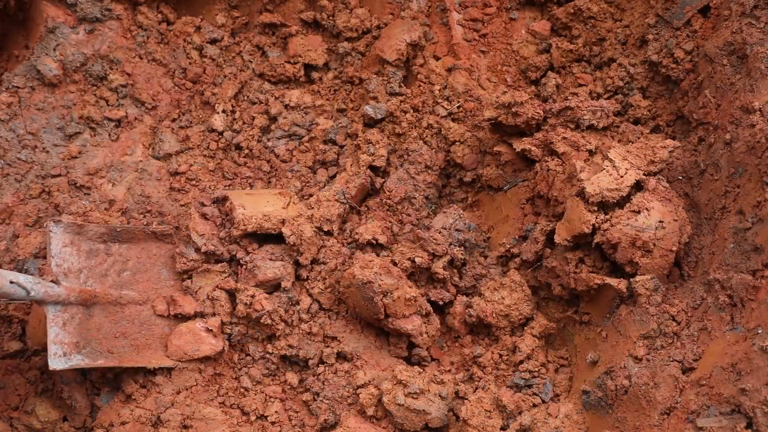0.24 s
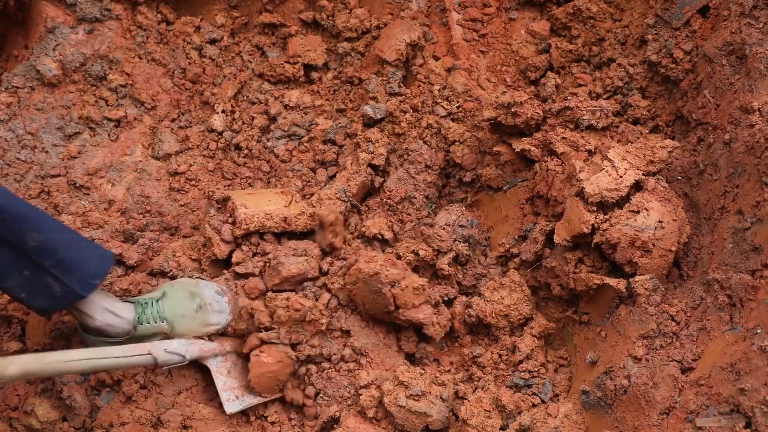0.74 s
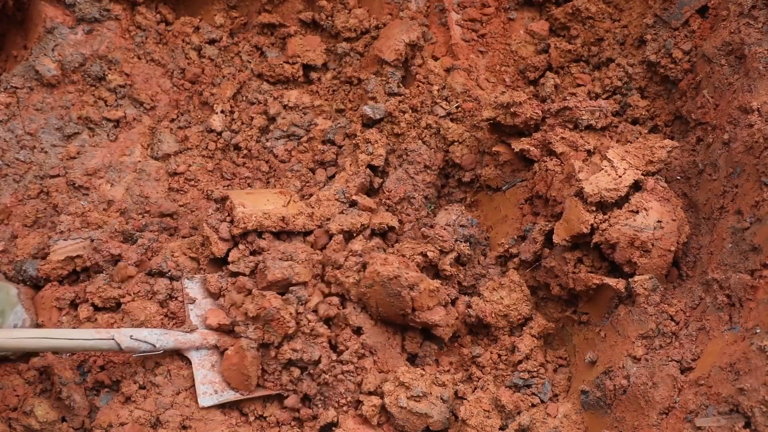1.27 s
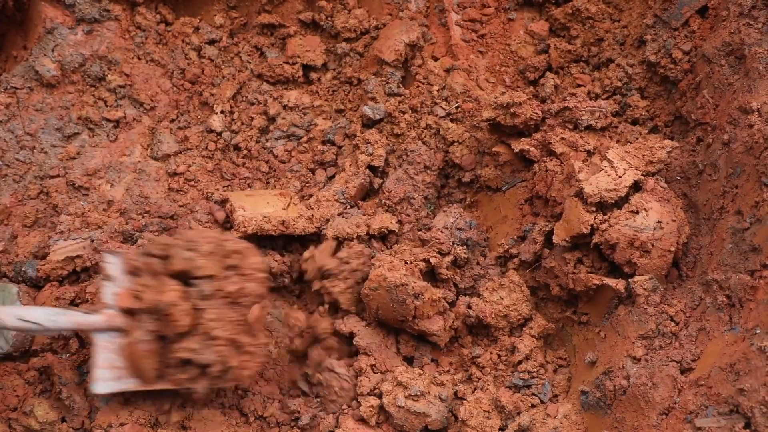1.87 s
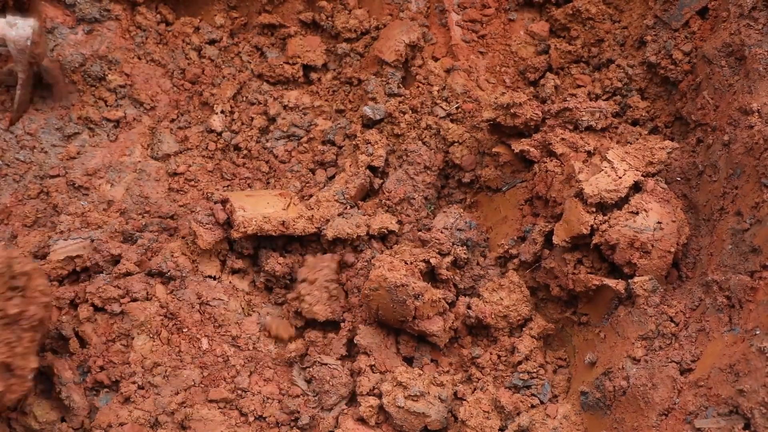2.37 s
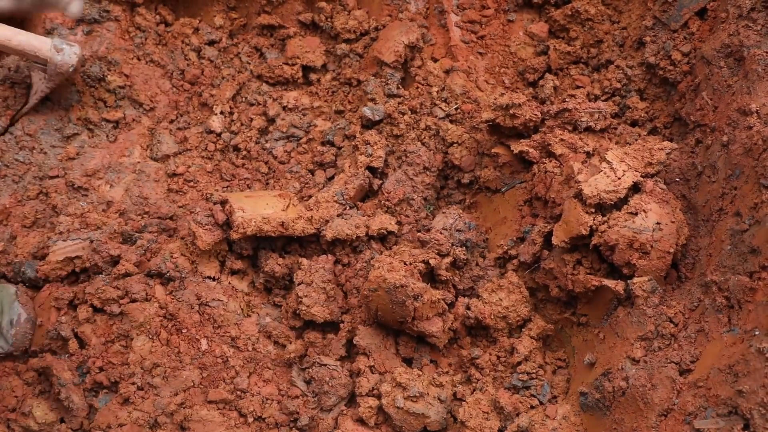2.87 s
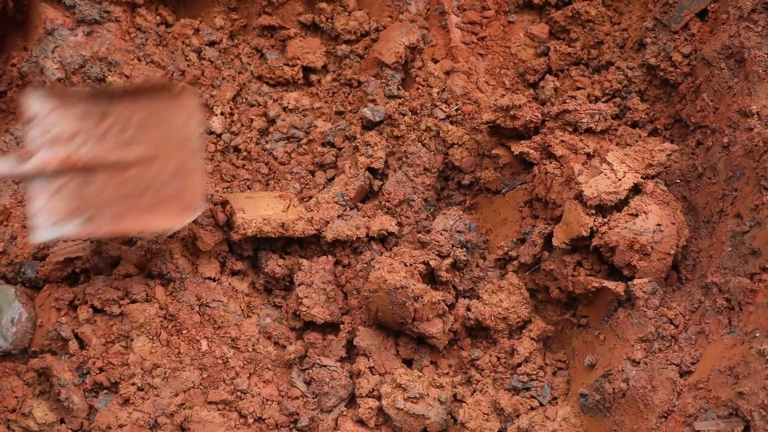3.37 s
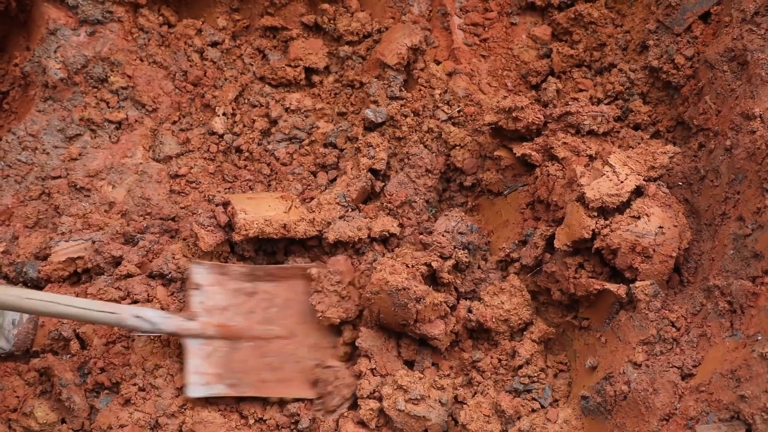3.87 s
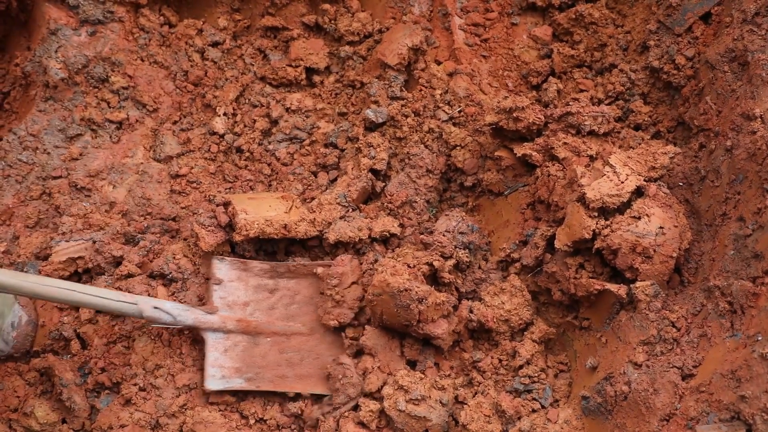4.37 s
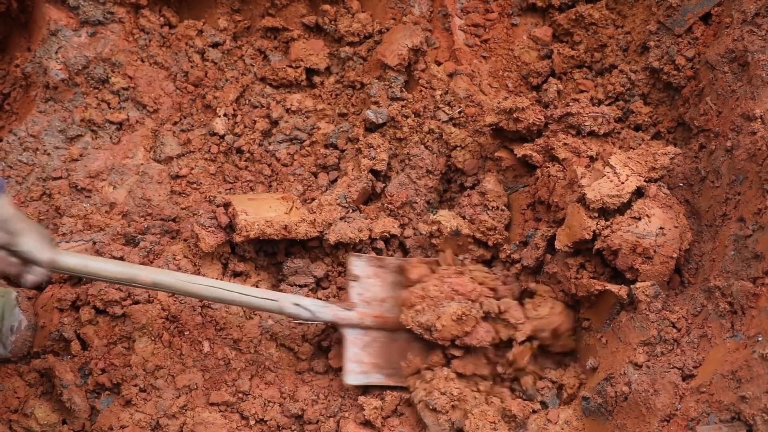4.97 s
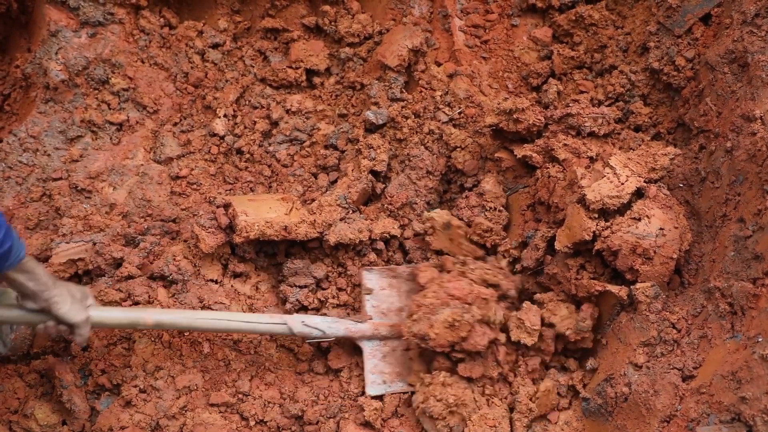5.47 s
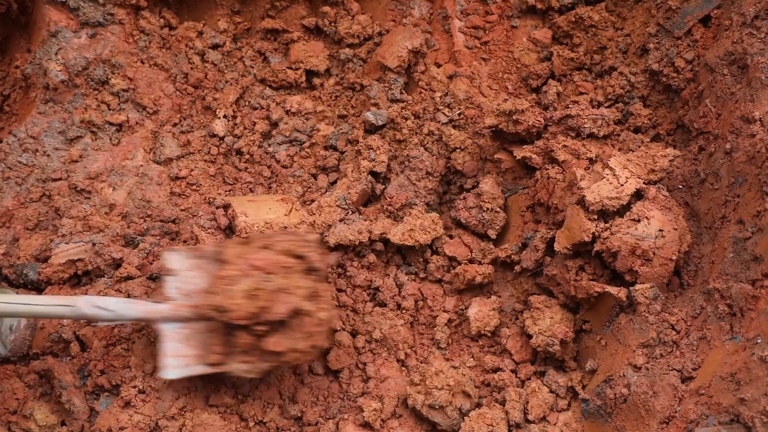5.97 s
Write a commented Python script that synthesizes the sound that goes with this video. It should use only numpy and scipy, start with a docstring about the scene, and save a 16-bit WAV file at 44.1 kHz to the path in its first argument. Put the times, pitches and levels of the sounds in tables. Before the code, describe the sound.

Close, irregular digging outdoors in damp clay. A spade crunches in, grit rasping along the steel, and loose crumbs tick quietly. A stone snaps sharply against the blade and tossed clods land with soft thumps. A brief metallic knock starts a second run of scrapes and crunches, which ends in a quiet rustle of soil. The open air behind is only a faint hiss.

```python
"""A steel spade is trodden and pushed into wet, crumbly clay, and the loads are lifted and thrown.
Stick-slip friction drives the sound: clods crush dully and grit rasps along the blade, exciting its
damped modes. Stones knock and snap on the steel, air pockets pop in the mud, and the emptied blade hums.
Falling soil thuds on the ground. Behind it lie a faint outdoor hiss and a few low puffs of wind."""
import sys
import numpy as np
from scipy import signal
from scipy.fft import rfft, irfft
from scipy.io import wavfile

SR = 44100
rng = np.random.default_rng(int(sys.argv[2]) if len(sys.argv) > 2 else 0)


def store_pcm(level_fs):
    """Save levels as 16-bit WAV."""
    pcm = np.round(np.clip(level_fs, -1, 1) * 32767).astype(np.int16)
    wavfile.write(sys.argv[1], SR, np.atleast_2d(pcm).T)


N = 274863


def from_db(db):
    return 10 ** (np.asarray(db) / 20)


def unit_rms(x):
    return x / np.sqrt(np.mean(x ** 2) + 1e-20)


def band(x, low_hz, high_hz):
    return signal.sosfilt(signal.butter(2, [low_hz, high_hz], "band", fs=SR, output="sos"), x)


def high_pass(x, hz):
    return signal.sosfilt(signal.butter(4, hz, "high", fs=SR, output="sos"), x)


def place(out, start_s, sound, peak_db):
    """Superposition: adds a sound at the given time and peak level."""
    at = round(start_s * SR)
    out[at:at + len(sound)] += (from_db(peak_db) * sound / np.abs(sound).max())[:N - at]


def drift(rate_hz, step=40):
    """Random modulation: low-passed noise with a standard deviation of 1."""
    pole = np.exp(-2 * np.pi * rate_hz * step / SR)
    noise = rng.standard_normal(N // step + 2002)
    slow = signal.lfilter([1], [1, -2 * pole, pole * pole], noise)[2000:]
    return np.interp(np.arange(N) / step, np.arange(len(slow)), unit_rms(slow - slow.mean()))


def swell(full_s, rise_s, hold_s, fall_s, depth_db=25):
    """Exponential growth and decay about a hold at 1; rise_s and fall_s each span depth_db."""
    t = np.arange(N) / SR - full_s
    rising = t / max(rise_s, 0.002)
    falling = (hold_s - t) / max(fall_s, 0.002)
    return from_db(depth_db * np.minimum(0, np.minimum(rising, falling)))


def colour(x, spectrum, size=2048):
    """Spectral shaping by a minimum-phase filter of unit energy."""
    hz, level_db = np.transpose(spectrum)
    grid_hz = np.arange(size + 1) * SR / (2 * size) + 1
    gain = from_db(np.interp(np.log(grid_hz), np.log(hz), level_db))
    cepstrum = irfft(np.log(gain))
    cepstrum[1:size] *= 2   # folding the cepstrum makes the response causal
    cepstrum[size + 1:] = 0
    response = irfft(np.exp(rfft(cepstrum)))[:size]
    return signal.oaconvolve(x, response / np.sqrt(np.sum(response ** 2)))[:len(x)]


def ring(force, hz, t60_s):
    """Damped oscillator: a unit impulse starts a decaying sine of height 1."""
    radius, angle = from_db(-60 / (t60_s * SR)), 2 * np.pi * hz / SR
    return signal.lfilter([0, np.sin(angle)], [1, -2 * radius * np.cos(angle), radius ** 2], force + 1e-18)


def grains(per_s, spread_db, clump_db, clump_hz):
    """Shot noise: random breaks of uneven size that come in clumps; rms 1."""
    sizes = from_db(spread_db * np.minimum(rng.exponential(1, N), 5)) * rng.choice([-1, 1], N)
    breaks = rng.random(N) < per_s / SR
    return unit_rms(sizes * breaks * from_db(clump_db * drift(clump_hz)))


def crumble(noise, t60_s, crumbs_db):
    """Impact force: a unit impulse at contact, then crumbs that decay exponentially."""
    force = from_db(crumbs_db - 60 * np.arange(len(noise)) / SR / t60_s) * noise
    force[0] = 1
    return force


# spectrum of the distant hiss: frequency_hz, density_db
AIR_SPECTRUM = [(15, -59), (25, -3), (190, -6), (335, 4.5), (405, 1), (545, 1), (818, -6.5), (2000, 0),
                (2840, -4), (5280, -14), (7310, -15), (8140, -20.5), (10700, -17.5), (14800, -22.5),
                (16000, -34)]
# puffs of wind: full_s, hold_s, level_db
WIND_PUFFS = [(2.41, .01, -64), (2.83, .05, -69), (3.36, .01, -56), (4.58, .02, -69), (5.0, .02, -69),
              (5.928, 0.24, -54.5)]


def outdoors(hiss_db=-52, calm_db=-91.5, rise_s=0.12, fall_s=0.2):
    """Ambient noise: distant hiss, and wind pressure on the microphone at the bottom of hearing."""
    hiss = colour(rng.standard_normal(N), AIR_SPECTRUM, size=8192) * from_db(hiss_db + drift(1))
    pressure = unit_rms(band(rng.standard_normal(N), 16, 50))
    puffs = sum(from_db(db) * swell(full_s, rise_s, hold_s, fall_s) for full_s, hold_s, db in WIND_PUFFS)
    return hiss + (from_db(calm_db) + puffs) * from_db(0.74 * drift(8)) * pressure


# lumps and shoe striking the ground: start_s, peak_db, pitch_hz
GROUND_THUMPS = [(0.4277, -38.5, 213), (.564, -35, 136), (0.601, -28.5, 170), (1.1713, -43, 182),
                 (1.497, -48, 129), (2.376, -26.5, 135), (2.407, -33, 150), (2.9778, -35, 233),
                 (3.333, -29, 277), (3.357, -26, 100), (3.434, -31, 141), (4.464, -32, 215),
                 (4.588, -39, 235)]


def ground(thud_db):
    """Low-frequency excitation: shifting soil rumbles, and soft impacts set the ground booming."""
    shifting = grains(900, spread_db=2, clump_db=1.5, clump_hz=15)
    out = from_db(thud_db) * unit_rms(band(shifting, 100, 337))
    push = np.pad(np.hanning(130), (0, 9000))   # a contact of 3 ms
    for start_s, peak_db, pitch_hz in GROUND_THUMPS:
        place(out, start_s, ring(push, pitch_hz, t60_s=0.079), peak_db)
    return high_pass(out, 106)


def blade_hum(start_s=3.0, stop_s=3.31, pitch_hz=177.5, level_db=-57.5, rise_db_per_s=2):
    """Free vibration: the emptied blade's lowest bending mode, stopped when the spade is caught."""
    t = np.arange(N) / SR
    gate = np.clip(np.minimum(t - start_s, stop_s - t) / 0.025, 0, 1)
    gain = from_db(level_db + rise_db_per_s * np.clip(t - start_s, 0, 1))
    return gain * gate * np.sin(2 * np.pi * pitch_hz * t)


# wet mud squeezed round the shoe: full_s, rise_s, hold_s, fall_s, level_db
MUD_SQUEEZES = [(0.758, .01, 0.062, 0.063, -47), (1.0, 0.16, 0.19, .2, -53)]


def mud_sizzle():
    """Band-limited shot noise: tiny air pockets pop in squeezed mud."""
    gain = sum(from_db(db) * swell(*timing) for *timing, db in MUD_SQUEEZES)
    pops = grains(1200, spread_db=2.5, clump_db=2, clump_hz=58)
    return gain * unit_rms(band(pops, 4650, 6150))


# bright gritty hiss and clicks, as coloured by the microphone: frequency_hz, density_db
BRIGHT_SPECTRUM = [(2470, -7), (4200, 0.5), (5250, -10), (5880, -4), (6390, -6.5), (7070, -2), (8080, -9.5),
                   (8890, -3), (10900, -2.5), (13200, -14), (14700, -15.5), (15600, -37), (16000, -42)]
# grit snapping under the edge: start_s, peak_db, pitch_hz
GRIT_SNAPS = [(0.644, -10, 7150), (.7506, -28, 6400), (1.3683, -33, 6950), (1.7818, -32.5, 10100),
              (2.375, -3, 9000), (2.3797, -2, 10200), (2.4125, -8, 10000), (2.5334, -28.5, 5500),
              (2.586, -25.5, 7100), (2.6982, -28.5, 10000), (2.787, -22, 9330), (2.9435, -28, 11460),
              (2.9505, -27, 11460), (2.9898, -23, 10200), (3.807, -9, 8800), (3.809, -14, 6050),
              (3.8213, -9.5, 9400), (3.929, -14, 10500), (4.312, -24, 9300), (4.4982, -2.5, 9560),
              (4.539, -14.5, 9380), (4.5615, -22, 10610), (4.9923, -2, 9700), (5.0083, -2.5, 9400),
              (5.319, -30, 12000), (5.3236, -22.5, 11800)]


def grit_snaps(ping_db=4, t60_cycles=29):
    """Brittle fracture: a bright click, and a ping from the chip that breaks."""
    out = np.zeros(N)
    for start_s, peak_db, pitch_hz in GRIT_SNAPS:
        force = crumble(rng.standard_normal(3000), t60_s=0.024, crumbs_db=-21.5)
        click = unit_rms(colour(force, BRIGHT_SPECTRUM))
        ping = from_db(ping_db) * unit_rms(ring(force, pitch_hz, t60_cycles / pitch_hz))
        place(out, start_s, band(click + ping, 3600, 13800), peak_db)
    return out


# modes of the blade, damped by soil: pitch_hz, level_db, t60_s
BLADE_MODES = [(646, 10, 0.079), (786, -20.5, 0.013), (970, -1.5, 0.067), (1086, 8, 0.025),
               (1520, -2, 0.023), (1586, 4.5, 0.037), (1978, -6, 0.13), (2402, 8.5, 0.057),
               (2460, -8, 0.11), (2834, -3.5, 0.04), (2885, 8.5, 0.016), (3600, -28, 0.15),
               (3730, -1.5, 0.072)]


def blade(force):
    """Modal superposition: the blade's modes respond in parallel, with alternating signs."""
    return sum((-1) ** k * from_db(db) * ring(force, hz, t60_s)
               for k, (hz, db, t60_s) in enumerate(BLADE_MODES))


# clods and stones striking the blade: start_s, peak_db, pitch_hz, t60_s
LUMP_KNOCKS = [(0.551, -23.5, 3180, 0.014), (0.5611, -26.5, 740, 0.011), (0.579, -20, 1280, 0.026),
               (0.5989, -10.5, 1480, 0.0073), (0.6064, -6, 2650, .0062), (.613, -10, 600, 0.018),
               (0.6203, -5.5, 1610, 0.013), (.6481, -8.5, 1050, 0.042), (.8373, -18.5, 545, 0.064),
               (1.1016, -30, 3100, 0.016), (1.169, -25.5, 1650, 0.05), (1.268, -27.5, 1680, 0.021),
               (1.284, -29.5, 1600, 0.017), (1.363, -27, 1620, 0.019), (1.395, -31, 1230, 0.017),
               (1.408, -27, 1670, 0.0072), (1.786, -32.5, 1070, 0.005), (1.872, -32, 950, 0.0088),
               (2.253, -28.5, 1990, 0.0041), (2.379, -11.5, 1400, 0.036), (2.38, -9, 4050, .008),
               (2.3833, -17, 1770, 0.025), (2.4114, -8, 4030, .006), (2.4117, -6.5, 2370, 0.004),
               (2.534, -23.5, 2010, 0.011), (2.6412, -32, 1170, 0.0099), (2.7083, -26.5, 2530, 0.0098),
               (2.7496, -30, 1170, 0.01), (2.7819, -20, 1360, 0.013), (2.8022, -22.5, 2520, .018),
               (2.8382, -29, 2470, .015), (2.98, -24, 1090, 0.018), (3.332, -24.5, 335, 0.031),
               (3.3658, -23, 3960, 0.012), (3.4331, -22, 440, 0.017), (3.807, -2.5, 1480, 0.048),
               (3.8084, -7, 2810, 0.024), (3.8105, -4.5, 1440, .015), (3.8443, -27, 2520, .012),
               (3.93, -16, 2600, 0.017), (4.3118, -22.5, 3200, .011), (4.4387, -19.5, 3500, .008),
               (4.4563, -17, 850, .0091), (4.4739, -10, 900, 0.0079), (4.4888, -12, 750, 0.016),
               (4.5227, -11, 626, 0.0084), (4.5629, -15, 2450, 0.0092), (4.5865, -4, 1620, 0.0075),
               (4.6448, -24, 1650, .013), (4.9519, -19, 920, 0.0071), (4.9926, -10.5, 2420, 0.012),
               (5.011, -13, 2130, 0.013), (5.05, -17, 740, 0.018), (5.1343, -33, 690, .013),
               (5.186, -30, 2130, 0.014), (5.32, -27, 4350, .016), (5.3225, -33, 616, 0.015),
               (5.6912, -24.5, 1640, 0.015), (5.8049, -35, 1990, 0.019)]


def knocks(blade_db=-10.5):
    """Impact excitation: each lump rings briefly at its own pitch and shakes the blade."""
    out = np.zeros(N)
    for start_s, peak_db, pitch_hz, t60_s in LUMP_KNOCKS:
        noise = rng.standard_normal(5000)
        crumbs = noise * (noise ** 2 > 1.5)
        force = crumble(crumbs, t60_s=0.071, crumbs_db=-27.5)
        force = signal.lfilter([1], [1, -0.6], force)   # clay cushions the contact
        lump = unit_rms(high_pass(ring(force, pitch_hz, t60_s), 0.37 * pitch_hz))
        place(out, start_s, lump + from_db(blade_db) * unit_rms(blade(force)), peak_db)
    return out


# modes that sing out of the rasp: start_s, stop_s, pitch_hz, bandwidth_hz, relative_db
SINGING_MODES = [(0.562, .72, 1015, 130, -8), (0.584, 0.72, 1570, 80, -10), (1.4, 1.1, 1600, 150, -6),
                 (2.784, 2.96, 950, 50, -5.5), (2.985, 3.015, 4300, 180, 2), (2.976, 2.8, 667, 37, 0),
                 (2.975, 3.031, 377, 14, -3), (5.9, 4.5, 1447, 65, -4), (3.8, 4.1, 2680, 100, -7.5),
                 (3.5, 3.6, 1600, 42, -5), (4.43, 4.595, 580, 101, -5), (4.94, 5.09, 2010, 190, -4),
                 (4.945, 5.097, 580, 46, -11), (5.802, 6.157, 214, 17, 5.5), (5.8, 6.136, 400, 16, -5.5)]


def singing(scratch):
    """Forced resonance: scratching feeds one narrow mode for the length of a drag."""
    out = np.zeros(N)
    for start_s, stop_s, pitch_hz, bandwidth_hz, relative_db in SINGING_MODES:
        if stop_s > start_s:
            drag = slice(round(start_s * SR), round(stop_s * SR))
            tone = ring(scratch[drag], pitch_hz, t60_s=np.log(1000) / (np.pi * bandwidth_hz))
            out[drag] += from_db(relative_db) * unit_rms(tone) * signal.windows.tukey(len(tone), 0.2)
    return out


# loose crumbs trickling between strokes: time_s, clod_db, rasp_db, grit_db
CRUMB_TRICKLE = [(0, -63, -57.5, -54), (.4, -61, -60, -62), (.75, -59, -69, -51), (1.14, -68, -48.5, -52.5),
                 (1.4, -81, -60.5, -54.5), (1.7, -56, -52.5, -62), (1.95, -56.5, -57, -61),
                 (2.12, -52, -58, -72), (2.45, -55, -45.5, -53), (2.62, -56, -44, -49),
                 (2.74, -60, -53, -52.5), (3.25, -56, -50, -53.5), (3.52, -59, -50, -51.5),
                 (3.71, -64, -51, -57), (3.79, -68, -49.5, -44.5), (4.0, -49.5, -47, -51),
                 (4.27, -57, -54.5, -56.5), (4.9, -53, -52.5, -60), (5.2, -51, -47.5, -57),
                 (5.45, -59, -56, -66.5), (6.23, -60, -57, -64)]
# strokes of blade, shoe and soil: full_s, rise_s, hold_s, fall_s, thud_db, clod_db, rasp_db, grit_db
SPADE_STROKES = [(0.078, 0.091, 0.055, 0.29, -63, -58, -46.5, -59),
                 (0.433, 0.0072, 0.014, .05, -47, -55, -49, -51),
                 (0.525, 0.14, 0.026, .05, -62, -58, -40.5, -43.5),
                 (0.554, 0.0072, .02, .03, -40, -46, -32.5, -40),
                 (0.582, .006, 0.026, .02, -39, -44, -24, -31),
                 (0.604, 0.025, 0.052, 0.037, -41, -25.5, -19, -25),
                 (.67, 0.027, 0.015, 0.075, -42, -26, -22.5, -33.5),
                 (0.744, 0.042, 0.041, 0.12, -51, -38, -38.5, -54),
                 (0.837, 0.02, 0.011, 0.051, -40, -30.5, -43, -47),
                 (0.926, 0.13, 0.042, 0.079, -63, -49, -50, -45),
                 (1.17, 0.026, .005, 0.074, -51, -44.5, -44, -50),
                 (1.265, 0.011, 0.019, 0.013, -60, -47, -40.5, -56),
                 (1.366, 0.013, .008, 0.027, -61, -37, -38, -60),
                 (1.404, .01, 0.0055, 0.024, -65, -40, -37.5, -54),
                 (1.521, 0.1, 0.11, .05, -66, -75, -48.5, -50),
                 (2.36, 0.26, 0.019, 0.022, -52, -64, -44, -48),
                 (2.377, 0.0069, 0.0049, 0.034, -26, -45, -17.5, -19),
                 (2.41, .004, 0.0034, 0.035, -33, -45, -29, -34),
                 (2.536, .004, .005, 0.022, -48, -49, -43, -48),
                 (2.788, 0.073, 0.073, 0.12, -50, -47, -37, -37),
                 (2.862, .02, 0.063, 0.1, -48, -42, -36.5, -42.5),
                 (2.984, 0.018, 0.014, 0.055, -56, -31.5, -37.5, -57),
                 (3.353, 0.083, 0.021, 0.18, -39, -43, -43, -44),
                 (3.433, 0.0087, 0.011, 0.067, -38.5, -47.5, -62, -68),
                 (3.815, 0.011, 0.033, 0.023, -46.5, -27.5, -23.5, -36),
                 (3.885, 0.051, 0.065, 0.023, -58, -30, -26, -32),
                 (4.148, 0.043, 0.035, 0.14, -60, -40, -41.5, -55),
                 (4.289, .006, 0.022, .03, -63, -43.5, -45, -45),
                 (4.306, .006, .025, 0.087, -63, -36, -35, -41),
                 (4.406, 0.09, 0.044, 0.056, -54, -35.5, -35, -41),
                 (4.455, .02, 0.048, 0.018, -46, -26, -27.5, -41.5),
                 (4.514, .02, 0.072, 0.047, -43, -29, -27, -37),
                 (4.632, 0.067, .01, 0.062, -51, -37, -32, -41.5),
                 (4.707, 0.052, 0.012, 0.07, -54, -43, -45.5, -57),
                 (4.952, .015, .04, 0.033, -48, -41, -33.5, -44.5),
                 (4.998, 0.018, 0.016, 0.069, -55, -32.5, -29.5, -35.5),
                 (5.037, 0.028, 0.039, 0.091, -55, -37.5, -37.5, -40),
                 (5.135, 0.022, 0.011, 0.049, -57, -44, -44, -59),
                 (5.227, .06, 0.075, .03, -68, -64, -56, -50.5),
                 (5.314, .006, 0.027, 0.013, -60, -40, -42.5, -53),
                 (5.51, 0.028, 0.068, 0.017, -62, -45.5, -49.5, -68),
                 (5.681, .01, 0.05, .02, -54.5, -50, -44, -51),
                 (5.803, 0.047, .14, 0.31, -59, -46.5, -47.5, -61)]


def soil_levels(thud_floor_db=-63.5):
    """Incoherent addition: trickle and strokes sum in power, giving thud, clod, rasp and grit in dB."""
    time_s, *columns = np.transpose(CRUMB_TRICKLE)
    trickle_db = [np.interp(np.arange(N) / SR, time_s, column) for column in columns]
    power = from_db([np.full(N, thud_floor_db), *trickle_db]) ** 2
    for stroke in SPADE_STROKES:
        timing, levels_db = stroke[:4], stroke[4:]
        power += np.outer(from_db(levels_db), swell(*timing)) ** 2
    return 10 * np.log10(power)


# spectrum of clods being crushed: frequency_hz, density_db
CLOD_SPECTRUM = [(120, -23), (200, -15), (408, -3), (494, -2), (599, 3), (1440, -3), (1600, -8),
                 (2080, -19), (3520, -120)]
# spectrum of grit rasping on steel: frequency_hz, density_db
RASP_SPECTRUM = [(470, -28.5), (800, 2.5), (1030, 10.5), (1430, 4), (1560, 10.5), (2120, 7.5), (2680, 10.5),
                 (5500, -10.5), (7150, -21), (12100, -120)]


def digging(clod_db, rasp_db, grit_db):
    """Stick-slip friction: three grain sizes surge together as the edge catches and slides."""
    surge = from_db(1.2 * drift(45))
    clods = colour(grains(1500, spread_db=1.5, clump_db=2.5, clump_hz=20.5), CLOD_SPECTRUM)
    scratch = grains(4000, spread_db=1.5, clump_db=1.95, clump_hz=25)
    steel = from_db(-9.5) * unit_rms(band(blade(scratch), 950, 5200))
    rasp = unit_rms(colour(scratch, RASP_SPECTRUM) + steel) + singing(scratch)
    grit = colour(grains(7000, spread_db=2, clump_db=1.5, clump_hz=96), BRIGHT_SPECTRUM)
    return surge * (from_db(clod_db) * clods + from_db(rasp_db) * rasp + from_db(grit_db) * grit)


def scene():
    """Superposition: spade, ground and open air sum in one channel."""
    thud_db, clod_db, rasp_db, grit_db = soil_levels()
    spade = digging(clod_db, rasp_db, grit_db) + mud_sizzle() + knocks() + grit_snaps()
    spade = high_pass(spade, 264)   # small bodies radiate no deep bass
    return (spade + ground(thud_db) + blade_hum() + outdoors())[None]


def record(dry, ceiling=1.6, stopband_hz=16700):
    """Soft saturation rounds the peaks; a steep low-pass cuts the highest treble."""
    rounded = ceiling * np.tanh(dry / ceiling)
    return signal.sosfilt(signal.cheby2(18, 80, stopband_hz, fs=SR, output="sos"), rounded)


dry = scene()
out = record(dry)
store_pcm(out)
```